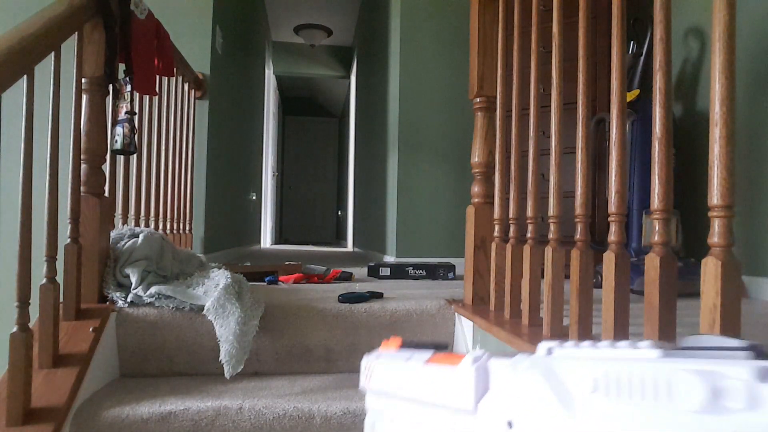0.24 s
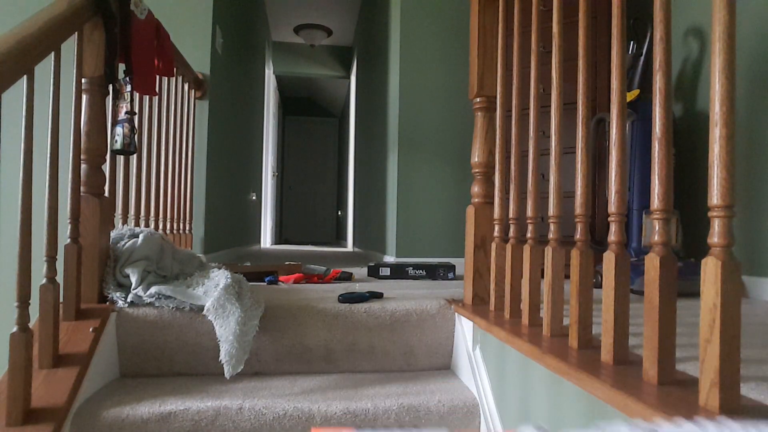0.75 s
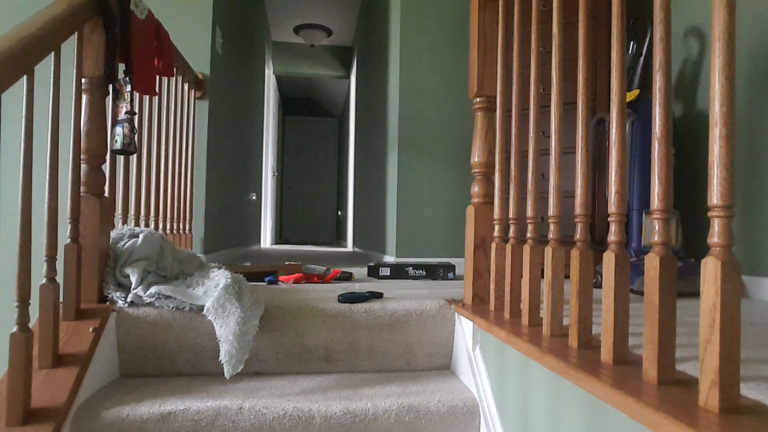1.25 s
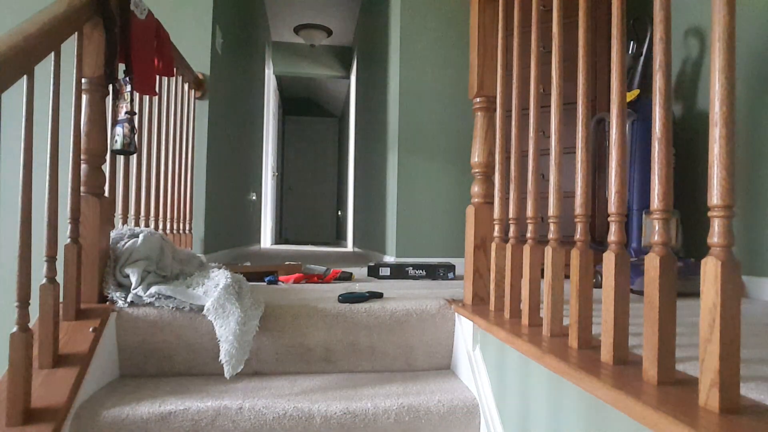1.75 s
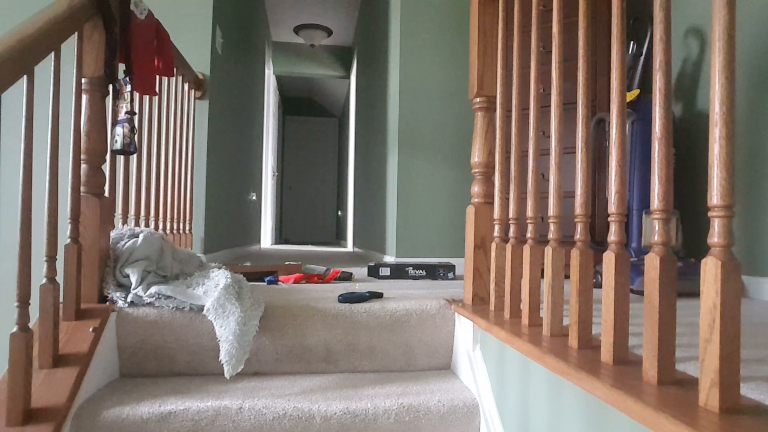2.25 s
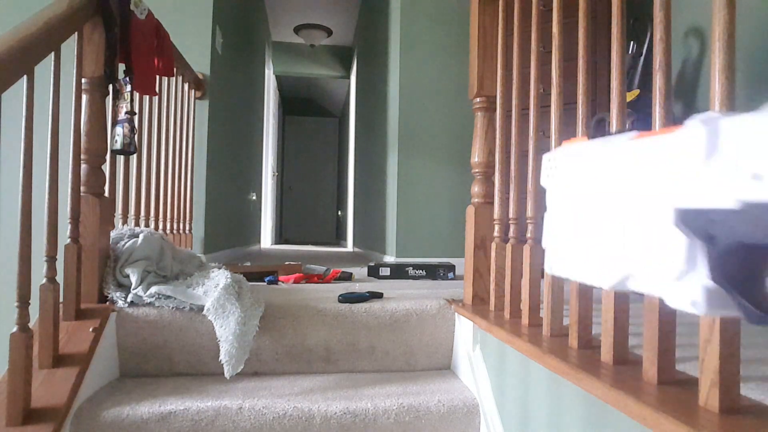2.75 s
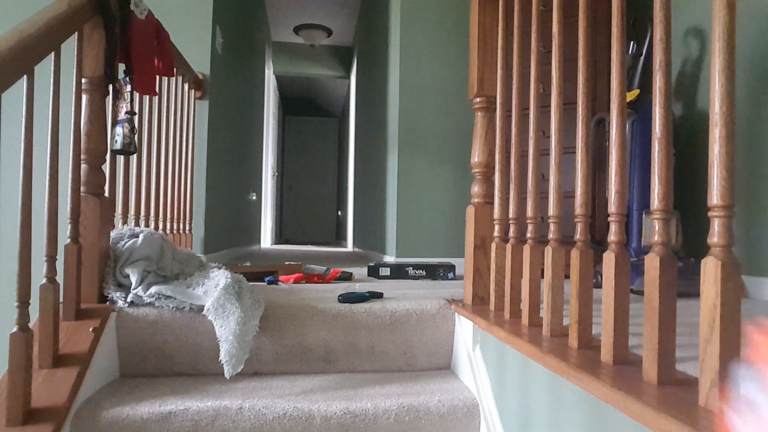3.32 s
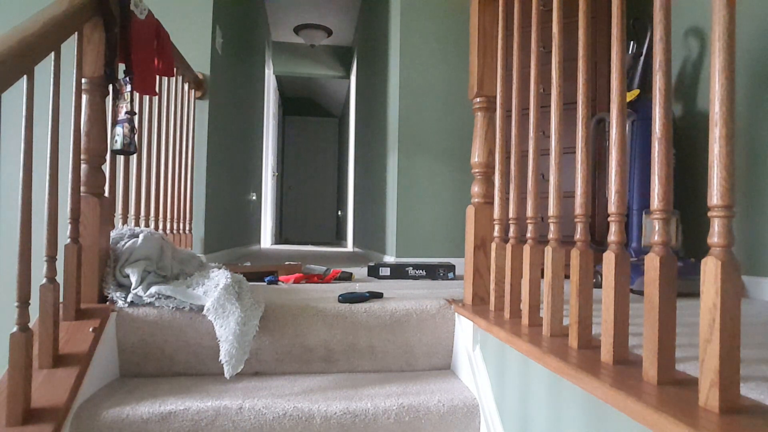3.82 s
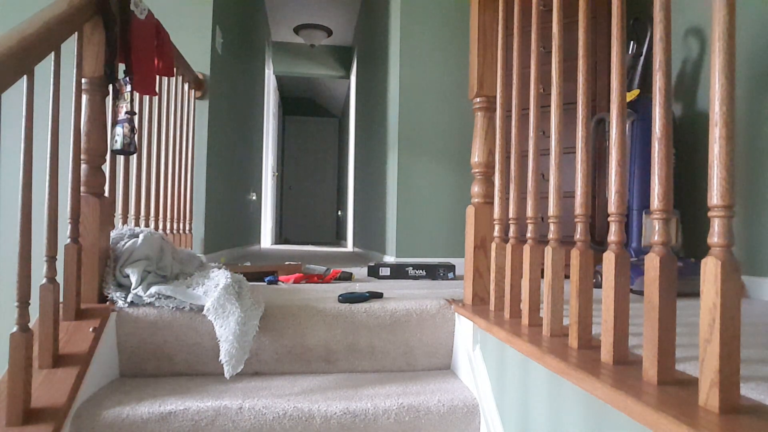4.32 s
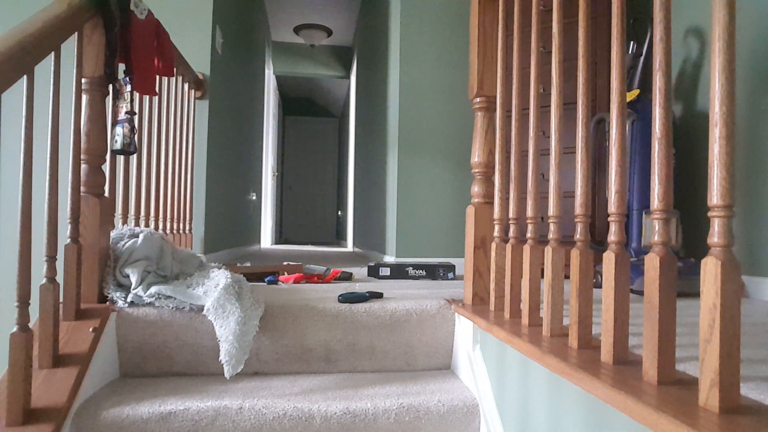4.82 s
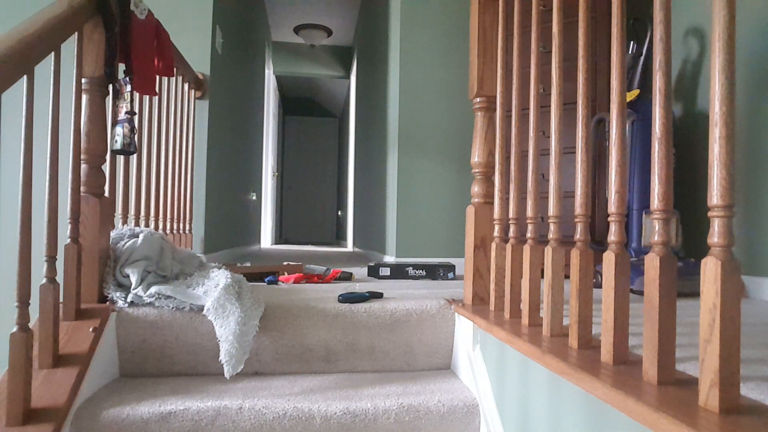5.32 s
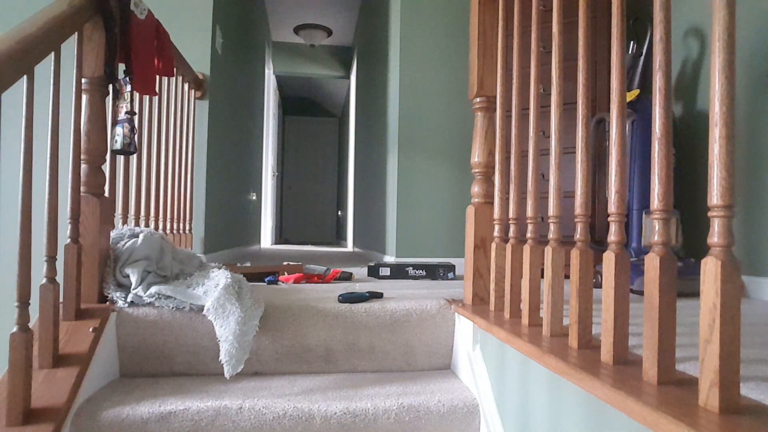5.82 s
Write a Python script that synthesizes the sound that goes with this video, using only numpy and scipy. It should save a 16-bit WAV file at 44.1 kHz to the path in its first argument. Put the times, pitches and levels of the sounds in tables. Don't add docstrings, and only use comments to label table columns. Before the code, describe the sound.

A faint, steady low house hush and microphone hiss runs throughout. From 0.6 to 1.75 s there are only tiny plastic ticks and light rubbing, the clearest near 1.47. At 1.8 s a toy blaster's slide rattles and scrapes very close, slightly left, slamming in hard bright clacks around 1.95-2.05, with another dense cluster at 2.25-2.33. Small handling clicks follow at 2.7-2.86. At 2.97 the shot snaps: a puff of air, a hollow plunger slam, then a brief metallic spring shudder and barrel ring. At 3.38 a dull woody thud lands on a far hall door, with weak bounces to 3.6. After a lull, clacks burst at 4.0-4.25, smaller ones at 4.44, and a soft low stair bump at 4.54. Quiet fumbling leads to sharp clacks at 5.2, a lesser one at 5.39, and a loud rattling slam at 5.55-5.65. The stairwell rings about half a second after each hit, then settles into hush.

```python
import sys
import numpy as np
from scipy import signal
from scipy.fft import rfft, irfft, next_fast_len
from scipy.io import wavfile
from scipy.ndimage import uniform_filter1d

SR = 44100
rng = np.random.default_rng(int(sys.argv[2]) if len(sys.argv) > 2 else 0)


def ratio_of_db(decibels):
    return 10 ** (np.asarray(decibels, float) / 20)


def store_pcm(level_fs):
    pcm = np.round(np.clip(level_fs, -1, 1) * 32767).astype(np.int16)
    wavfile.write(sys.argv[1], SR, np.atleast_2d(pcm).T)


N = 267378

# (frequency [Hz], width [Hz], level [dB])
SHELL_MODES = [(264, 90, -19.5), (366.4, 37, -2), (449.5, 43, -4.5), (570.6, 40, -0.5), (644.4, 60, -1),
               (735, 110, -4.5), (1108, 500, -9.5)]
# (frequency [Hz], width [Hz], level [dB])
PART_MODES = [(1360, 330, 1), (1650, 1260, -1.5), (2170, 330, 1.5), (2740, 610, -2), (3680, 2200, -3.5),
              (4654, 980, -4)]
# (frequency [Hz], width [Hz], level [dB])
EDGE_MODES = [(6100, 9350, 2.5), (9500, 12000, 2), (13700, 9300, -10.5)]
# (time [s], level [dB], rise [ms])
SHOT = (2.972, -6.5, 0.48)


def along(points, hz):
    f, v = np.transpose(points)
    return np.interp(np.log(hz + 1), np.log(f + 1), v)


def filtered(x, response):
    m = next_fast_len(x.shape[-1] + 8192)
    spectrum = rfft(x, m) * response(np.fft.rfftfreq(m, 1 / SR))
    return irfft(spectrum, m)[..., :x.shape[-1]]


def resonances(modes, f):
    low_hz, top_hz = 0.44 * modes[0][0], 2.4 * modes[-1][0]
    skirts = 1j * f / (low_hz + 1j * f) / (1 + 1j * f / top_hz) ** 1.5
    total = 0
    for k, (mode_hz, width_hz, db) in enumerate(modes):
        damping = 1j * f * width_hz
        total = total + (-1) ** k * ratio_of_db(db) * damping / (mode_hz * mode_hz - f * f + damping)
    return skirts * total


def ringing(x, modes):
    return filtered(x, lambda f: resonances(modes, f))


def diffuse(pair, colour):
    # (frequency [Hz], left-right likeness [-1..1])
    likeness = [(60, 0.68), (130, 0.98), (290, 0.93), (640, 0.45), (1400, -0.36), (3000, -0.0044)]

    def mid_side(hz):
        turn = np.arccos(np.clip(along(likeness, hz), -1, 1)) / 2
        return ratio_of_db(along(colour, hz)) * [np.cos(turn), np.sin(turn)]

    mid, side = filtered(pair, mid_side)
    return np.array([mid + side, mid - side])


def hush():
    # (frequency [Hz], density [dB per Hz])
    floor = [(20, -25), (55, -3), (120, -6.5), (200, -13.5), (350, -16), (800, -26), (2000, -26.5),
             (5000, -38), (9000, -41.5), (16500, -42)]
    x = diffuse(rng.standard_normal((2, N)), floor)
    return ratio_of_db(-63 + 0.5) * x / np.std(x)


def stairwell(x, longer=1):
    # (frequency [Hz], t60 [s])
    decay = [(60, .2), (170, 0.49), (400, 0.5), (1400, 0.58), (3000, 0.51), (6000, 0.49), (11000, 0.38),
             (16000, 0.26)]
    # (frequency [Hz], level [dB])
    walls = [(100, 2), (400, 0), (1500, -1), (4000, -0.5), (9000, 0), (15000, 2.5)]
    step = SR // 4
    out = np.zeros((2, N + 2 * SR))
    starts = np.arange(0, N, step)
    energy = np.add.reduceat(x ** 2, starts)
    for start in starts[energy > 1e-9]:
        hz, t, z = signal.stft(rng.standard_normal((2, 3 * step)), SR, nperseg=256)
        t60_s = longer * along(decay, hz)[:, None]
        tail = signal.istft(z * ratio_of_db(-60 * t / t60_s), SR, nperseg=256)[1]
        tail *= 1 - np.exp(-np.arange(tail.shape[1]) / (0.0022 * SR))
        tail /= np.linalg.norm(tail[0])
        wet = signal.fftconvolve(x[None, start:start + step], tail, axes=1)
        out[:, start:start + wet.shape[1]] += wet
    return diffuse(out[:, :N], walls)


def soft_blows(blows, modes):
    force, ticks, sent = np.zeros((3, N))
    t = np.arange(SR // 20) / SR
    push = np.exp(-t / 0.00013) * (1 - np.exp(-t / 0.00016))
    for s, db, tick_db in blows:
        i = round(s * SR)
        force[i:][:len(t)] += ratio_of_db(db + 24.5) * push * rng.choice([-1, 1])
        ticks[i:][:len(t)] += ratio_of_db(tick_db + 3 - 60 * t / 0.02) * rng.standard_normal(len(t))
        sent[i] += ratio_of_db(tick_db + 30.5)

    def soft(f):
        return 1 / (1 + 1j * f / 2500)

    wood = ringing(force, modes)
    return np.array([wood + filtered(ticks, soft), wood + filtered(sent, lambda f: soft(f) ** 2.1)])


def door_thuds():
    # (time [s], peak [dB], tick [dB])
    blows = [
        (3.383, -6.5, -27),
        (3.397, -8.5, -67),
        (3.419, -13, -72.5),
        (3.458, -29, -80),
        (3.494, -20, -74),
        (3.532, -29.5, -68),
        (3.62, -28, -66),
    ]
    # (frequency [Hz], width [Hz], level [dB])
    door_modes = [(117, 25, -15.5), (200, 28, -7.5), (271, 99, -7), (327, 34, 4.5), (390, 72, -7.5),
                  (461, 2.9, 8.5), (516, 44, -8.5), (625, 30, -3.5), (720, 72, -8.5), (1040, 610, -18.5)]
    return soft_blows(blows, door_modes)


def stair_bumps():
    # (time [s], peak [dB], tick [dB])
    blows = [
        (4.538, -21, -44),
        (4.548, -16, -31.5),
        (4.565, -20.5, -61),
        (4.59, -24.5, -39.5),
        (4.645, -34, -57),
        (4.73, -46, -56),
    ]
    # (frequency [Hz], width [Hz], level [dB])
    stair_modes = [(162, 63, -12), (203, 26, -6.5), (324, 30, 1.5), (486, 200, -7), (714, 130, -6.5),
                   (1045, 110, -5.5), (1270, 290, -5)]
    return soft_blows(blows, stair_modes)


def scrape():
    # (start [s], end [s], first level [dB], last level [dB], edge share [dB])
    strokes = [(0.9, 1.08, -67, -57, -4), (1.08, 1.217, -55.5, -77, 11), (1.23, 1.75, -61.5, -59, -2.5),
               (1.893, 2.06, -60, -34, -4), (2.22, 2.341, -43, -30, -2), (2.709, 2.898, -62, -67.5, -4),
               (4.05, 4.258, -62, -44, -6), (4.4, 4.5, -47, -50.5, -3), (5.18, 5.263, -60, -57, -3),
               (5.3, 5.45, -62.5, -62.5, 13), (5.534, 5.655, -51, -46.5, 6)]
    t, level = np.arange(N) / SR, np.zeros((2, N))
    for start, end, first_db, last_db, edge_db in strokes:
        fade = np.clip(np.minimum(t - start, end - t) / 0.0027, 0, 1)
        stroke_db = np.interp(t, [start, end], [first_db, last_db]) - 4.5
        level += fade * ratio_of_db(stroke_db) * ratio_of_db([[0], [edge_db]])
    happens = rng.random(N) < 2500 / SR
    ticks = happens * rng.standard_normal(N) * ratio_of_db(2.5 * rng.exponential(size=N))
    force, sharp = level * ticks / np.std(ticks)
    sound = ratio_of_db(15.5) * ringing(force, SHELL_MODES)
    sound += ratio_of_db(1.5) * ringing(force, PART_MODES)
    sound += ratio_of_db(-3) * ringing(sharp, EDGE_MODES)
    return sound * ratio_of_db([[1.5], [-1.5]])


def shudder():
    # (frequency [Hz], width [Hz], level [dB])
    spring_modes = [(1030, 60, -2.5), (1435, 440, -13), (1746, 80, 0), (2200, 390, -12.5),
                    (2646, 370, -6.5), (3580, 920, -15), (4770, 930, -14.5), (9000, 10000, -27.5)]
    t = np.maximum(np.arange(N) / SR - SHOT[0] - .01, 0)
    force = rng.standard_normal((2, N)) * (1 - np.exp(-t / 0.023)) * ratio_of_db(8.5 - 60 * t / 0.28)
    return ringing(force, spring_modes)


def plunger():
    # (frequency [Hz], level [dB], t60 [s])
    barrel = [(155, -24, 0.12), (270.8, -19.5, 0.23), (337.8, -21.5, 0.37), (430, -30, 0.072),
              (645, -9.5, .16), (694, -10.5, 0.2), (780, -27, 0.1)]
    s, db, rise_ms = SHOT
    u = np.maximum(np.arange(N) / SR - s, 0) * 1000 / rise_ms
    puff = ratio_of_db(db) * u * (2 - u) * np.exp(-u)
    t = np.maximum(np.arange(N) / SR - s - .009, 0)
    ring = np.zeros(N)
    for k, (hz, ring_db, t60_s) in enumerate(barrel):
        ring += (-1) ** k * ratio_of_db(ring_db - 60 * t / min(t60_s, 1 / 5)) * np.sin(2 * np.pi * hz * t)
    return puff, ring * (1 - np.exp(-t / 0.0055))


def contacts():
    # (time [s], click [dB], hollow share [dB], edge share [dB])
    touches = [(0.641, -49.5, -2.5, -17), (0.671, -59.5, -9, -20), (0.949, -61, 1, -24),
               (0.974, -62.5, -2, -18), (1.03, -66.5, 8, -22), (1.08, -47, -2.5, -16.5),
               (1.161, -55.5, -13, -6.5), (1.179, -54, 0.5, -19), (1.189, -51.5, -6.5, -27),
               (1.224, -52.5, 0.5, -26), (1.338, -56.5, -2, -12), (1.349, -47.5, 0, -12),
               (1.373, -56, -2, -16), (1.412, -56, -8, -13), (1.468, -40, -4, -8.5),
               (1.485, -53, -1.5, -10), (1.756, -53, -2, -15.5), (2.713, -54.5, -9, -22),
               (2.749, -59, 5.5, -13.5), (2.761, -48, 0.5, -17.5), (2.768, -48.5, 4, -16),
               (2.828, -65, 2.5, -13.5), (2.861, -46, 3, -10), (4.735, -61.5, 9, -7),
               (4.966, -57, 8.5, -22), (5.044, -57.5, -8, -18), (5.065, -59.5, 9.5, -11),
               (5.143, -58.5, 1.5, -15), (5.167, -38, -13, -21.5)]
    # (time [s], click [dB], rattle [ms])
    catches = [(1.817, -47, 4.4), (1.832, -38, 8.3), (1.845, -38, 8.3), (1.859, -26.5, 6.7),
               (1.874, -29.5, 3), (1.9011, -30, 3.1), (2.248, -30.5, 18), (2.272, -25, 9.2),
               (4.011, -51, 5.7), (4.018, -46.5, 7.7), (4.029, -35.5, 18), (4.051, -24, 9.3),
               (4.06, -24.5, 9.9), (4.079, -25.5, 4.6), (4.157, -30, 6.9), (4.427, -43, 11),
               (5.198, -46.5, 8), (5.208, -35, 17), (5.224, -24.5, 5.2), (5.388, -38, 5.7),
               (5.541, -35.5, 2.3), (5.55, -34, 8.8), (5.558, -28.5, 5.3), (5.579, -23.5, 8.5)]
    # (time [s], click [dB], hollow share [dB], rattle [ms])
    slams = [(1.8898, -18, -4, 7), (1.947, -31, 0, 4.7), (1.952, -15.5, -3.5, 2.7),
             (2.0232, -13.5, -11, 3.1), (2.036, -11.5, -6.5, 16), (2.0461, -16.5, -0.5, 7.1),
             (2.155, -25, -1, 3), (2.2794, -10, -6, 3.1), (2.289, -11.5, -12, 2.7), (2.297, -15, -7, 5.7),
             (2.308, -17.5, -3.5, 9.2), (2.319, -12, -3, 6), (2.971, -14.5, 1, 5.9), (4.0706, -13, -3, 8.9),
             (4.101, -21, -2.5, 7.9), (4.14, -27, -4, 8.5), (4.176, -9, -20, 5), (4.1996, -16, 1.8, 6.5),
             (4.235, -30.5, 1, 3.2), (4.241, -20, -5, 6.9), (4.443, -17.5, 1.5, 2),
             (5.23, -11.5, -10.5, 5.4), (5.394, -26.5, -9, 4.9), (5.589, -9, -4.5, 6),
             (5.602, -14.5, -13, 5.7), (5.607, -17.5, -9.5, 6), (5.625, -19.5, -11, 8.8),
             (5.632, -10.5, -8.5, 3.5), (5.641, -19.5, -9, 8.1)]
    # (time [s], click [dB], edge share [dB])
    knocks = [(1.298, -57, -12), (1.389, -57, -8), (2.0513, -25, -7.5), (2.328, -26, 6.5),
              (2.98, -12.5, -14), (3.15, -38, -7), (3.974, -59, -10.5), (4.2146, -22, -2.5),
              (4.439, -34, -6), (4.449, -25.5, -26), (4.462, -56, -9), (4.48, -49, -14), (5.09, -62.5, -14),
              (5.241, -29.5, -3.5), (5.617, -21.5, -3.5), (6.054, -53, -14)]
    return ([(s, db, hollow_db, edge_db, 7, 4.5) for s, db, hollow_db, edge_db in touches]
            + [(s, db, 3, -18, 5, ms) for s, db, ms in catches]
            + [(s, db, hollow_db, -8.5, 4, ms) for s, db, hollow_db, ms in slams]
            + [(s, db, 8, edge_db, 6, 3.5) for s, db, edge_db in knocks])


def struck(modes, pressure, smooth_ms, unlike):
    f = np.fft.rfftfreq(len(pressure), 1 / SR)
    own = rng.standard_normal((3, len(pressure)))
    held = np.array(modes) * (1 + 0.059 * rng.standard_normal((len(modes), 3)))
    held[:, 2] = np.array(modes)[:, 2] + 3.1 * rng.standard_normal(len(modes))
    response = resonances(held, f)
    x = irfft(rfft((own[0] + unlike * own[1:]) * pressure) * response)
    x /= np.sqrt(uniform_filter1d(np.mean(x ** 2, 0), int(smooth_ms * SR / 1000)).max())
    sent = irfft(resonances(modes, f) + .5 * response) * np.sign(own[0, 0])
    sent = np.roll(sent, int(abs(own[1, 0]) * SR / 500))
    sent *= np.sqrt(np.mean(x ** 2) / np.mean(sent ** 2))
    return np.vstack([x, sent])


def clacks():
    out, t = np.zeros((3, N + SR)), np.arange(3072) / SR
    for s, db, hollow_db, edge_db, pan_db, rattle_ms in contacts():
        side_db = np.array([[pan_db / 2], [-pan_db / 2], [0]])
        rebounds = ratio_of_db(4.0 * np.repeat(rng.standard_normal(len(t) // 32), 32))
        pressure = rebounds * ratio_of_db(-10 * t * 1000 / max(rattle_ms, 1)) * (1 - np.exp(-t / 0.00033))
        shell = struck(SHELL_MODES, pressure, smooth_ms=2.7, unlike=0.099)
        parts = struck(PART_MODES, pressure, smooth_ms=0.88, unlike=0.64)
        edges = struck(EDGE_MODES, pressure ** 1.4, smooth_ms=5.7, unlike=1.0)
        hit = ratio_of_db(hollow_db + .5 * side_db) * shell
        hit += ratio_of_db(0.48 + side_db) * parts
        hit += ratio_of_db(edge_db - 1.5 + 2.2 * side_db) * edges
        out[:, round(s * SR):][:, :hit.shape[1]] += ratio_of_db(db) * hit
    return out[:2, :N], out[2, :N]


def scene():
    floor = hush()
    door, door_sent = door_thuds()
    stair, stair_sent = stair_bumps()
    rattle = scrape() + shudder()
    puff, ring = plunger()
    hits, hits_sent = clacks()

    near = hits + rattle + ring + puff
    lag = 14
    heard = np.array([np.roll(near[0], -lag // 2), np.roll(near[1], lag // 2)])
    sent = ratio_of_db(-5.5) * (hits_sent + rattle[0]) + ratio_of_db(-3.5) * ring + ratio_of_db(-16.5) * puff
    sent += ratio_of_db(3.0) * stair_sent
    hall = stairwell(ratio_of_db(1.0) * door_sent, longer=1.22)
    return heard + ratio_of_db(1) * (door + stair) + stairwell(sent) + hall + floor


def low_pass(x):
    return signal.sosfilt(signal.butter(12, 16640, fs=SR, output="sos"), x)


def record(dry):
    clipped = dry / (1 + np.abs(dry) ** 3) ** (1 / 3)
    band_limit = [(15600, 1), (16000, -21.0), (16700, -45)]  # (frequency [Hz], level [dB])
    mix = filtered(clipped, lambda hz: ratio_of_db(along(band_limit, hz)))
    return low_pass(mix)


dry = scene()
out = record(dry)
store_pcm(out)
```